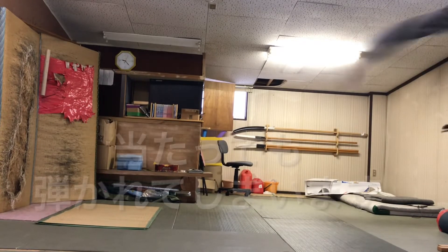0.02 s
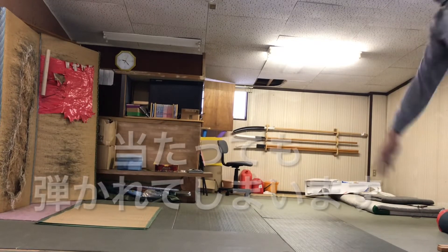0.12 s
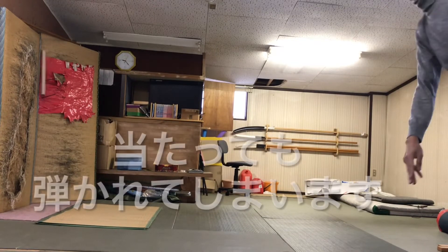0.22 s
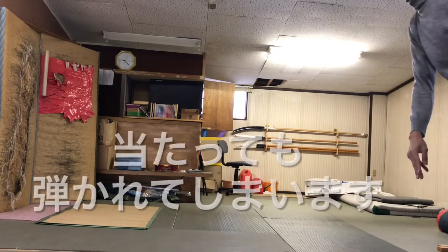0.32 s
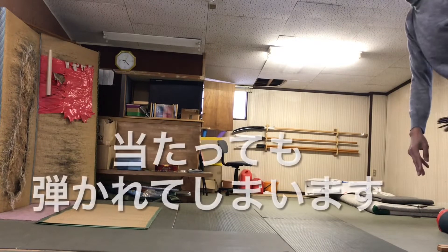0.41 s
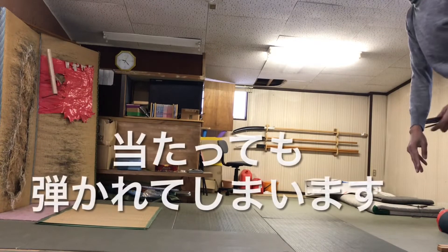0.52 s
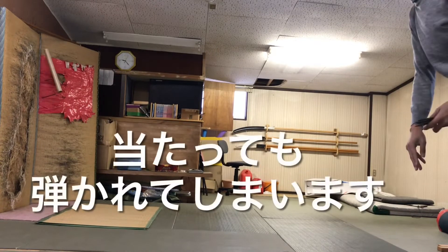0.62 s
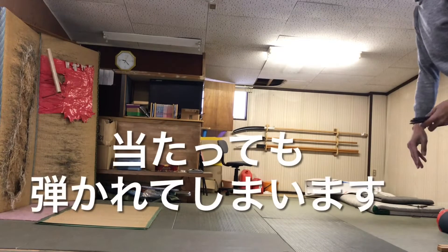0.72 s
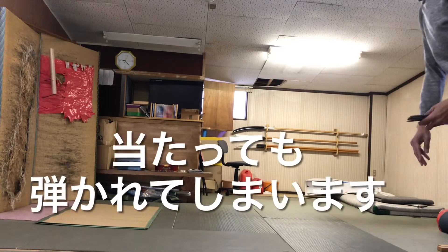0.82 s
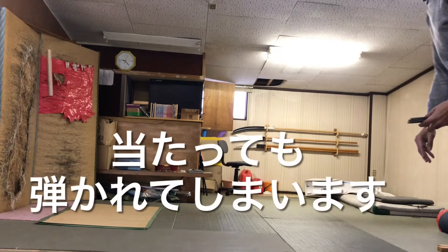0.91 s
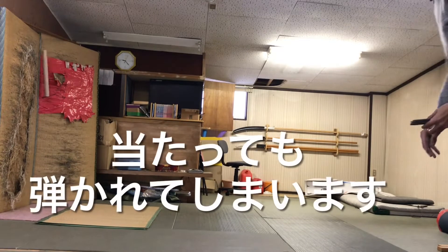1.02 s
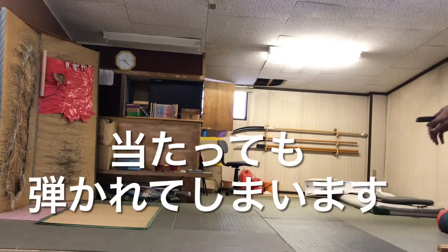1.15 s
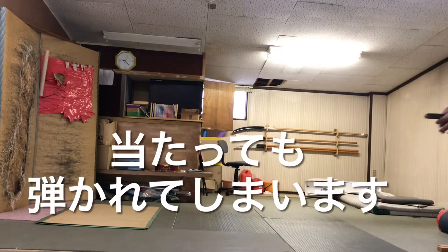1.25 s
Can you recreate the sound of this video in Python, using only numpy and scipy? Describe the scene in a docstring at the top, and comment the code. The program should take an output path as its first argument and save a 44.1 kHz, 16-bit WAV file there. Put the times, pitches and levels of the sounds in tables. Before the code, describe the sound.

A steel throwing spike strikes a hollow tube with a loud rattling clack after a faint sleeve swish, rings thinly while tumbling, then thuds on a floor mat and scuffs to rest in a small hall, miked nearby.

```python
"""A faint room hum and a sleeve rustle with a soft swish, then a thrown steel spike clacks off a hollow tube.
It rings, fluttering, as it tumbles; two bright ticks, a thud on the floor mat, a scrape and last small touches.
Blows are bursts of coloured noise with the dense echoes of a small hall; tube and mat add decaying sines.
The spike is bending modes under slow random gain; rustle, scrape and hum are coloured noise."""
import sys
import numpy as np
from scipy import signal
from scipy.fft import rfft, irfft
from scipy.io import wavfile
from scipy.ndimage import uniform_filter1d

SR = 44100
rng = np.random.default_rng(int(sys.argv[2]) if len(sys.argv) > 2 else 0)


def master_out(mix):
    """Clip the mix to full scale and print it as 16-bit PCM to the path in sys.argv[1]."""
    frames = np.transpose(np.atleast_2d(mix))
    ceiling = np.clip(frames, -1, 1)
    pcm = np.round(ceiling * 32767).astype(np.int16)
    wavfile.write(sys.argv[1], SR, pcm)


N = 57330
T = np.arange(N) / SR

# Spectra give relative density per Hz; colour() scales them to unit energy.
# room hum spectrum: pitch_hz, density_db
HUM_SPECTRUM = [(12, -26.5), (40, 10.5), (63, 4.5), (150, -9), (500, -11.5), (1500, -24.5), (4000, -36.5),
                (15200, -31), (16500, -58)]
# sleeve rustle level: time_s, level_db (before RUSTLE_GAIN_DB)
SLEEVE_LEVEL = [(0, -65), (.014, -65), (.134, -65.5), (.15, -64.5), (.19, -74), (.245, -56.5)]
# sleeve rustle spectrum: pitch_hz, density_db
SLEEVE_SPECTRUM = [(100, -1), (500, 0.5), (2000, -14.5), (16500, -19)]
# spare spikes chinking in the hand: pitch_hz, level_db
HAND_RINGS = [(7036, -72.5), (10368, -66), (14230, -61)]
# spike on tube, first touch and rattle: start_s, level_db, push_into_tube_db
CLACKS = [(.2494, -3.5, -9.5), (.2517, -10.5, -7), (.258, -5.5, -2), (.2685, -12, -15), (.277, -10, -22),
          (.298, -29.5, -13.5)]
# clack spectrum: pitch_hz, density_db
CLACK_SPECTRUM = [(30, -48), (100, -16), (300, -13), (600, -8.5), (1400, -11.5), (3000, -7), (6000, -10.5),
                  (10000, -16), (15500, -22.5), (17000, -50.5)]
# tube mode pitches: pitch_hz
TUBE_HZ = [505, 625, 740, 1000, 1099, 1215, 2004, 2445, 2552, 2735, 2835, 2947, 3095, 3210, 3692]
# tube modes, one row per pitch: level_db, t60_s
TUBE_MODES = [(-3, 0.065), (0, 0.055), (-6.5, 0.068), (-9.5, .12), (1.5, 0.28), (-8, 0.22), (-2, 0.2),
              (-11.5, 0.43), (-11, 0.41), (-8.5, 0.24), (-19.5, .25), (-2, 0.11), (-6, 0.32), (-9.5, 0.33),
              (-22.5, 0.22)]
# hall decay: pitch_hz, t60_s
HALL_T60 = [(60, 0.23), (250, 0.44), (600, 0.43), (1100, 0.34), (2000, 0.51), (4000, 0.41), (8000, 0.33),
            (16000, 0.17)]
# spike bending modes: pitch_hz, t60_s
SPIKE_MODES = [(875, 2.5), (2365, 1.78), (4495, 2.12), (7240, 4.4), (10664, 1.3), (14565, 2.2)]
# blows that set the spike ringing: start_s, tumble_hz, then level_db of each mode
SPIKE_RINGS = [(.25, 72, -68.5, -47.5, -44.5, -77, -101.5, -95),
               (0.922, 43, -77, -51.5, -45.5, -52.5, -50, -46.5)]
# small bright ticks: start_s, level_db
TICKS = [(.6225, -35), (.625, -32)]
# tick spectrum: pitch_hz, density_db
TICK_SPECTRUM = [(2000, -42), (4000, -27.5), (4550, -0.5), (5200, -15), (7500, -12.5), (11000, -12),
                 (15500, -9.5), (16200, -28)]
# spike on mat: start_s, level_db, push_into_mat_db
THUDS = [(.9228, -17, -18.5), (.9285, -17.5, -12), (.937, -22.5, -34), (.9435, -15.5, -20.5),
         (.948, -21, -19), (.959, -25, -17.5), (.972, -25, -25), (1.016, -40, -23), (1.04, -41, -52)]
# thud spectrum: pitch_hz, density_db
THUD_SPECTRUM = [(35, -75), (60, -19.5), (334, -4), (509, -6.5), (1030, -6), (2830, -20.5), (3840, -16.5),
                 (10100, -28), (15000, -19), (16500, -38)]
# mat mode pitches: pitch_hz
MAT_HZ = [152, 200, 245, 345, 625, 760, 850, 1012]
# mat modes, one row per pitch: level_db, t60_s
MAT_MODES = [(-13.5, 0.5), (-8.5, 0.19), (-3, 0.23), (-4.5, 0.2), (-7, 0.23), (-4.5, 0.12), (-7, 0.25),
             (-13.5, 0.31)]
# grainy scrape as the spike scuffles to rest: time_s, level_db
SCRAPE_LEVEL = [(1.13, -63.5), (1.18, -50), (1.221, -49), (1.225, -52), (1.245, -58), (1.3, -66)]
# touches as the spike comes to rest: start_s, level_db
SETTLES = [(1.2238, -28.5), (1.229, -37), (1.24, -28.5), (1.255, -31.5), (1.283, -36)]
# spectrum of scrape and last touches: pitch_hz, density_db
SETTLE_SPECTRUM = [(35, -23), (60, 4), (916, -2.5), (1130, -1.5), (1500, -3.5), (10100, -18),
                   (15000, -14.5), (16500, -38)]

HUM_DB, HUM_WANDER_DB, HUM_WANDER_HZ = -58, 1.3, 4
RUSTLE_GAIN_DB = 10
SWISH_S, SWISH_WIDTH_S, SWISH_HZ, SWISH_DB = 0.07, 0.046, 576, -55
HAND_START_S, HAND_END_S, HAND_T60_S = .015, .2, 0.71
ARM_WAVER_HZ = 30
CLACK_DECAY_S, TICK_DECAY_S, THUD_DECAY_S, SETTLE_DECAY_S = 0.0019, 0.00036, 0.0024, 0.0024  # to 1/e
TUBE_DB, MAT_DB = -13.5, -9.5
MODE_WAVER_HZ, MODE_STEADY = 35, 1.3  # steady part against waver of rms 1
LATE_ENERGY_DB, LATE_STRETCH = -15, 1.9  # weaker, slower tail under pushed decays
HALL_DB, HALL_RISE_S, HALL_RISE_CYCLES = 1.5, 0.001, 2.1
SPIKE_STEADY = 0.24
GRAIN_DB, GRAIN_HZ = 3, 140
BLOWS_DB, BASS_CUT_HZ = -1.5, 54
TOP_HZ, MIC_DRIVE = 16750, .8


def undb(db):
    """Amplitude ratio from dB."""
    return 10 ** (np.asarray(db) / 20)


def along(table, hz):
    """Read a (pitch_hz, value) table on a log-frequency axis."""
    table = np.array(table, float)
    return np.interp(np.log(hz), np.log(table[:, 0]), table[:, 1])


def curve(table):
    """Gain over time from (time_s, level_db) points; the ends hold."""
    time_s, level_db = np.array(table).T
    return undb(np.interp(T, time_s, level_db))


def colour(x, spectrum):
    """Causal minimum-phase filter with the given spectrum, unit energy."""
    log_gain = along(spectrum, np.linspace(1, SR / 2, 2049)) * np.log(10) / 20
    cepstrum = irfft(log_gain)
    # fold onto positive time: minimum phase
    cepstrum[1:2048] *= 2
    cepstrum[2049:] = 0
    response = irfft(np.exp(rfft(cepstrum)))
    response = response / np.sqrt(np.sum(response ** 2))
    return signal.fftconvolve(x, response)[:N]


def wobble(hz):
    """Slow complex random gain of about hz bandwidth, rms 1."""
    width = max(int(SR / hz / 2), 1)
    noise = rng.standard_normal((2, N))
    smooth = uniform_filter1d(uniform_filter1d(noise, width), width)
    return (smooth[0] + 1j * smooth[1]) / np.sqrt(2) / smooth.std()


def hum():
    """Coloured room noise whose level wanders slowly."""
    level = undb(HUM_DB + HUM_WANDER_DB * wobble(HUM_WANDER_HZ).real)
    return level * colour(rng.standard_normal(N), HUM_SPECTRUM)


def wavering_tone(hz, db):
    """Sine under a slow random gain."""
    gain = 1 + wobble(ARM_WAVER_HZ)
    return undb(db) * np.real(gain * np.exp(2j * np.pi * hz * T))


def thrower():
    """Cloth noise until the first clack, a low whistle as the arm swings and a faint ring from the hand."""
    rustle = colour(rng.standard_normal(N), SLEEVE_SPECTRUM) * curve(SLEEVE_LEVEL)
    rustle = rustle * undb(RUSTLE_GAIN_DB) * (T < CLACKS[0][0])
    swell = np.exp(-((T - SWISH_S) / SWISH_WIDTH_S) ** 2)
    swish = swell * wavering_tone(SWISH_HZ, SWISH_DB)
    held = (T > HAND_START_S) * (T < HAND_END_S)
    fade = held * undb(-60 * (T - HAND_START_S) / HAND_T60_S)
    chink = fade * sum(wavering_tone(hz, db) for hz, db in HAND_RINGS)
    return rustle + swish + chink


def fading(push, t60_s):
    """Amplitude of a body whose energy is fed by each push and dies in t60_s, over a faint slower tail."""
    def energy(decay_s):
        return signal.lfilter([1], [1, -undb(-120 / decay_s / SR)], push ** 2)
    return np.sqrt(energy(t60_s) + undb(2 * LATE_ENERGY_DB) * energy(LATE_STRETCH * t60_s))


def hall(push, decay_s, spectrum):
    """Dense echoes: half-octave noise bands, each dying at its own rate; the bass builds late."""
    bins_hz = np.fft.rfftfreq(N, 1 / SR) + 1
    noise = rfft(colour(rng.standard_normal(N), spectrum))
    tail = 0
    for hz in 40 * 2 ** np.arange(0, 9, .5):
        weight = np.clip(1 - 2 * np.abs(np.log2(bins_hz / hz)), 0, 1)
        band = irfft(noise * weight, N)
        rise_s = HALL_RISE_S + HALL_RISE_CYCLES / hz
        keep = np.exp(-1 / SR / rise_s)
        level = signal.lfilter([1 - keep], [1, -keep], fading(push, along(HALL_T60, hz)))
        tail = tail + band * level
    return undb(HALL_DB) * np.sqrt(decay_s / .07) * tail  # longer bursts feed more energy


def blows(events, decay_s, spectrum):
    """Each blow is a short burst of coloured noise with its echoes."""
    burst, push = np.zeros(N), np.zeros(N)
    for start_s, db in events:
        i = int(start_s * SR)
        shape = np.exp(-T[:N - i] / decay_s)
        burst[i:] += undb(db) * np.sign(rng.standard_normal(N)[i:]) * shape
        push[i] += undb(db)
    return colour(burst, spectrum) + hall(push, decay_s, spectrum)


def modes(push, pitches_hz, table):
    """Wavering, decaying sines fed by the pushes."""
    out = np.zeros(N)
    for hz, (db, t60_s) in zip(pitches_hz, table):
        gain = MODE_STEADY + wobble(MODE_WAVER_HZ)
        tone = np.imag(gain * np.exp(2j * np.pi * hz * T))
        out += undb(db) * fading(push, t60_s) * tone
    return out / np.hypot(MODE_STEADY, 1)


def struck(events, decay_s, spectrum, pitches_hz, table, body_db):
    """Blows that also ring a body."""
    push = np.zeros(N)
    for start_s, _, push_db in events:
        push[int(start_s * SR)] = undb(push_db)
    contact = blows([event[:2] for event in events], decay_s, spectrum)
    return contact + undb(body_db) * modes(push, pitches_hz, table)


def tube():
    """Spike contacts ring the hollow tube's modes."""
    return struck(CLACKS, CLACK_DECAY_S, CLACK_SPECTRUM, TUBE_HZ, TUBE_MODES, TUBE_DB)


def spike():
    """Long bending rings that flutter as the bar tumbles; landing cuts the old ring off."""
    out = np.zeros(N)
    ends_s = [ring[0] for ring in SPIKE_RINGS[1:]] + [N / SR]
    for (start_s, tumble_hz, *levels_db), end_s in zip(SPIKE_RINGS, ends_s):
        on = (T >= start_s) & (T < end_s)
        for (hz, t60_s), db in zip(SPIKE_MODES, levels_db):
            gain = SPIKE_STEADY + wobble(tumble_hz)
            tone = np.real(gain * np.exp(2j * np.pi * hz * T))
            out += on * undb(db - 60 * (T - start_s) / t60_s) * tone
    return out


def ticks():
    """Very short bright bursts."""
    return blows(TICKS, TICK_DECAY_S, TICK_SPECTRUM)


def mat():
    """Spike contacts ring the floor mat's low modes."""
    return struck(THUDS, THUD_DECAY_S, THUD_SPECTRUM, MAT_HZ, MAT_MODES, MAT_DB)


def scrape():
    """Dense uneven grains: noise under a fast random level."""
    grains = rng.standard_normal(N) * undb(GRAIN_DB * wobble(GRAIN_HZ).real)
    return colour(grains, SETTLE_SPECTRUM) * curve(SCRAPE_LEVEL) * (T > SCRAPE_LEVEL[0][0])


def settling():
    """Small short bursts as the spike touches and comes to rest."""
    return blows(SETTLES, SETTLE_DECAY_S, SETTLE_SPECTRUM)


def scene():
    """Sum all sources; blows and their echoes lose the deep bass."""
    hits = tube() + ticks() + mat() + settling()
    bass_cut = signal.butter(2, BASS_CUT_HZ, "high", fs=SR, output="sos")
    hits = undb(BLOWS_DB) * signal.sosfilt(bass_cut, hits)
    return (hum() + thrower() + hits + spike() + scrape())[None]


def record(dry):
    """The microphone rounds the loudest peaks and cuts the top."""
    rounded = np.tanh(MIC_DRIVE * dry) / MIC_DRIVE
    top_cut = signal.ellip(10, .2, 90, TOP_HZ, fs=SR, output="sos")
    return signal.sosfilt(top_cut, rounded)


dry = scene()
out = record(dry)
master_out(out)
```